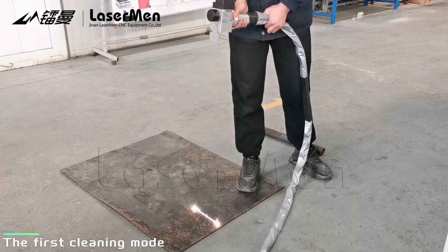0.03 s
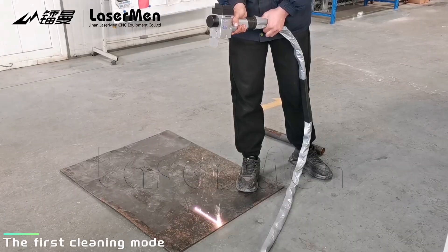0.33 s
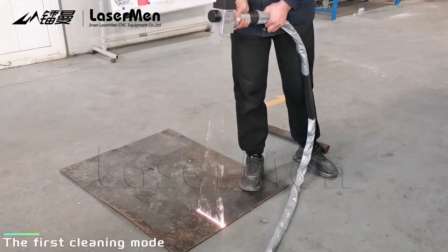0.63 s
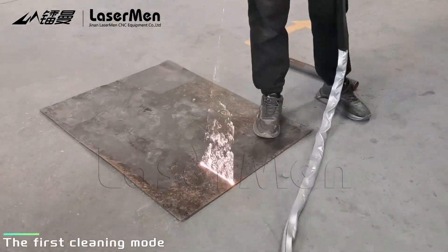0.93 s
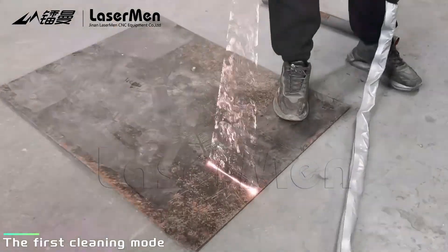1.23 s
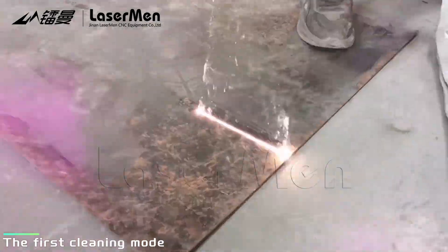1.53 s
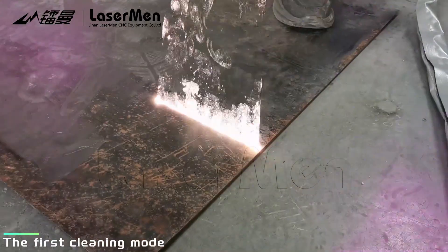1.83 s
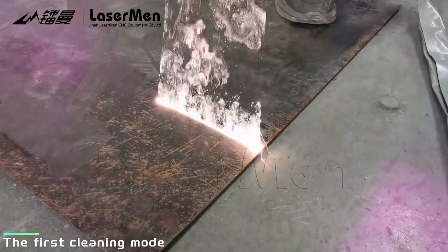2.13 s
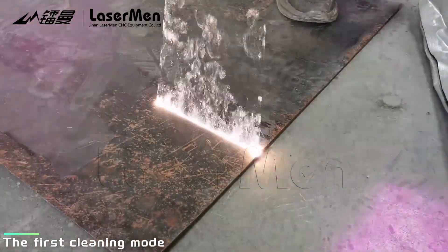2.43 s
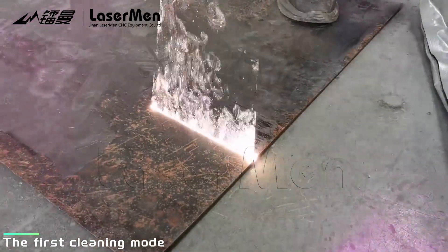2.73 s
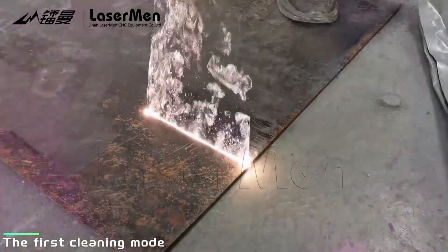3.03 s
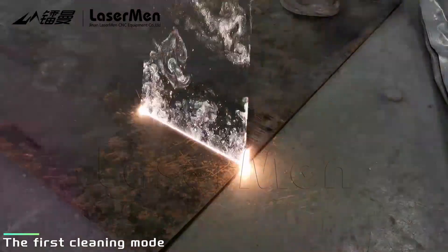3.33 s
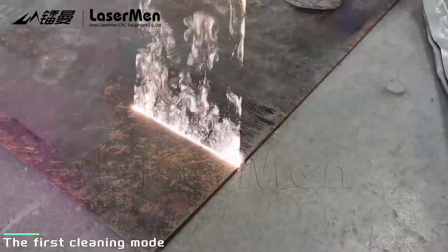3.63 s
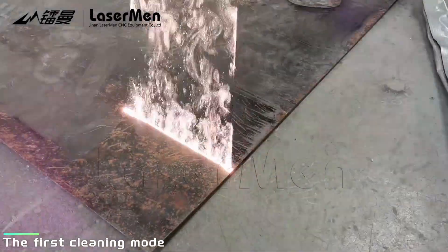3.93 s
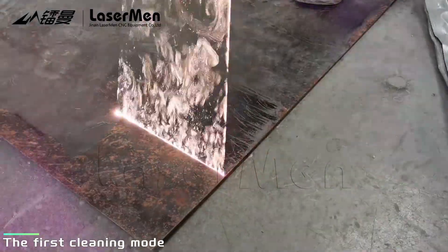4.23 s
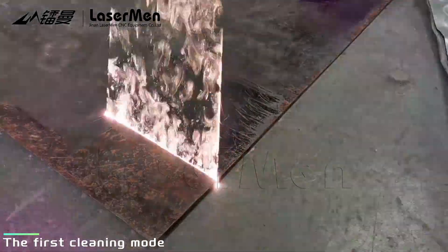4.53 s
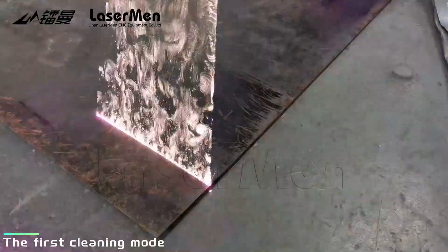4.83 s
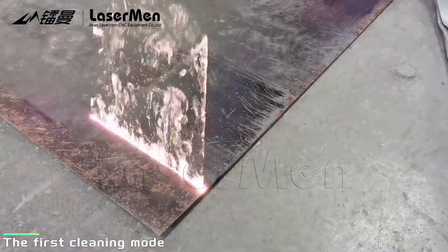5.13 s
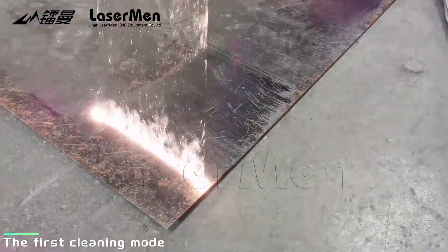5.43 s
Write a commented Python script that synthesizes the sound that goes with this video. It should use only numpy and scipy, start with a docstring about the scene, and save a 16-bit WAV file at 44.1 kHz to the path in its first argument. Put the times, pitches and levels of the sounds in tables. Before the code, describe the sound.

At about 0.1 seconds, after a tiny soft tone, a handheld laser cleaner catches on a rusty steel plate. Fine, rapid crackling fuses into a bright, sizzling buzz of constant pitch, with a lower rasp underneath. It runs without a break, swelling in short, irregular surges several times a second as the beam finds fresh rust, its colour shifting and its position drifting slightly between left and right. Duller, rougher flares at the plate's edge come around 1.7, 3.3, 4.8 and 5.6 seconds. Brief sharp spits stand out near 1.6, 3.0, 3.7 and 4.4 seconds. From about 3.5 seconds a slight high whistle sits within the buzz, which turns briefly hissier near 1.5 and 5.4 seconds. It is still going at the end, around 5.7 seconds. Behind it are a faint hum, low rumble and steady workshop air, heard in stereo with a short hall echo.

```python
"""A handheld laser cleaner strips rust from a steel plate on a workshop floor, heard at a stereo microphone.
Its mirror sweeps the beam along a line 153 times a second; every rust flake pops again at each sweep
until it is gone, so the crackle fuses into a buzz. The buzz swells as the hand finds fresh rust,
shifts in colour with distance and angle, and rasps where the beam flares at the plate's edge.
Behind it lie a hum at the sweep rate, the tail of the hall, a low rumble and steady workshop air."""
import sys
import numpy as np
from scipy import signal
from scipy.fft import rfft, irfft, next_fast_len
from scipy.io import wavfile
from scipy.ndimage import uniform_filter1d

SR = 44100
rng = np.random.default_rng(int(sys.argv[2]) if len(sys.argv) > 2 else 0)


def log_audio(samples):
    """Write samples as a 16-bit WAV file to the path given in sys.argv[1]."""
    # one column per channel
    frames = np.atleast_2d(samples).T
    # limit to full scale, then quantise
    limited = np.clip(frames, -1, 1)
    pcm = np.round(limited * 32767).astype(np.int16)
    wavfile.write(sys.argv[1], SR, pcm)


N = 251370
TIME = np.arange(N) / SR
SIZE = next_fast_len(N + SR)
HZ = np.maximum(np.arange(SIZE // 2 + 1) * SR / SIZE, 1)
SWEEP_HZ = 153.125
SWEEP_SAMPLES = round(SR / SWEEP_HZ)


def flakes(per_s=9000, spread_db=3):
    """Rust flakes burst on the plate at random moments, many small and a few large."""
    sizes = from_db(spread_db * np.minimum(rng.exponential(1, SIZE), 4))
    return sizes * rng.choice([-1, 1], SIZE) * (rng.random(SIZE) < per_s / SR)


# likeness of the pops at the left and right microphone: (frequency [Hz], correlation [0-1])
MIC_LIKENESS = [(450, 0.32), (1000, 0.19), (8000, 0.025)]
# how much of a pop comes back at the next sweep: (frequency [Hz], share [0-1])
POP_SURVIVAL = [(450, 0.74), (1500, 0.6), (4200, 0.56), (7000, 0.63), (10000, 0.55), (15000, 0.5)]
# how gradually a flake heats up before its strongest pop: (frequency [Hz], share [0-1])
HEAT_BUILD_UP = [(600, .75), (1500, .65), (4500, .45), (10000, .15)]
def buzz(stubborn_survival=.94, stubborn_gain=.3):
    """A flake heats up, then pops a little weaker at each sweep; stubborn rust lasts far longer."""
    alike, survival, build_up = over_hz(MIC_LIKENESS), over_hz(POP_SURVIVAL), over_hz(HEAT_BUILD_UP)
    pops = np.sqrt(alike) * rfft(flakes()) + np.sqrt(1 - alike) * rfft([flakes(), flakes()])
    sweep_delay = np.exp(-2j * np.pi * HZ / SWEEP_HZ)
    loose = per_harmonic(1 / ((1 - survival * sweep_delay) * (1 - build_up * survival * sweep_delay)))
    stubborn = per_harmonic(1 / (1 - stubborn_survival * sweep_delay))
    repeats = per_harmonic(loose + stubborn_gain * build_up * stubborn)
    return rms_one(irfft(pops * repeats, SIZE)[:, :N])


# steady burn as distance and rust change: (time [s], relative sizzle level [dB], rasp level [dB])
BURN_LEVELS = [(.1, -36, -52), (.8, -38, -49), (1.0, -38.5, -48.5), (1.45, -39.5, -47.5),
               (1.75, -34.5, -45), (2.05, -36.5, -50), (2.3, -35.5, -47), (2.75, -34.5, -47.5),
               (3.12, -36, -46), (3.3, -34, -47.5), (3.8, -35, -45.5), (4.3, -35.5, -47.5),
               (4.85, -34, -45.5), (5.08, -37.5, -46.5), (5.4, -37, -45.5), (5.7, -37, -46.5)]
# fine dust burns off at once and hisses without pitch: (time [s], share of the sizzle [0-1])
DUST_SHARE = [(1.1, 0), (1.48, 0.38), (1.7, 0.15), (2.6, 0.1), (3.6, 0.01), (5.15, 0), (5.4, 0.66),
              (5.55, 0.15)]
def burning_line(sizzle_rise_db, rasp_rise_db, flare_share):
    """The beam's line as it reaches the microphone through the hall: low rasp and bright sizzle."""
    line = shimmer(workshop(buzz()))
    dust = rms_one(np.array([flakes(), flakes()])[:, :N])
    dust_share = in_time(DUST_SHARE)[0]
    sizzle_db, rasp_db = in_time(BURN_LEVELS)
    patchy = rms_one(blend(line, dust, .23 * dust_share) * rust_patches())
    low = rasp(patchy, flare_share) * from_db(rasp_db + rasp_rise_db)
    bright = sizzle(blend(line, dust, dust_share)) * from_db(sizzle_db + sizzle_rise_db)
    return low + bright


# peak in the bite, gliding as the line moves: (time [s], centre [Hz], height [dB])
BITE_GLIDE = [(.1, 3600, 2.5), (.35, 3300, 4.3), (1, 3060, 3), (2.5, 3360, 4), (3.7, 4000, 1.9),
              (4.8, 4360, 3.7), (5.05, 4950, 3.3), (5.7, 4500, 5)]
# one harmonic whistles as the line nears the plate's edge: (time [s], centre [Hz], height [dB])
EDGE_WHISTLE = [(2.9, 4620, 0), (3.5, 4620, 5), (4.3, 4620, 7), (5.1, 4620, 7), (5.5, 4620, 4)]
# gliding peak in the hiss: (time [s], centre [Hz], height [dB])
HISS_GLIDE = [(.1, 6800, 7), (.8, 6700, -1), (1.05, 7200, 3.5), (1.5, 7100, 0), (2.9, 6260, 5),
              (3.3, 7100, 3.5), (5.7, 7260, 0)]
# band balance with distance and angle to the microphone: (time [s], bite [dB], hiss [dB], air [dB])
SIZZLE_COLOUR = [(.125, -4, -4.5, -4.5), (.56, -3.5, -4.5, -5.5), (1, -11, -5.5, -3), (1.6, -6, -5.5, -5),
                 (2.7, -4, -6.5, -3.5), (3.74, -2.5, -6.5, -3), (4.07, -4, -5.5, -3),
                 (4.4, -4, -10.5, -6.5), (5.35, -2.5, -6, -4.5), (5.5, -4, -7, -3.5)]
# where the line lies in front of the microphone: (time [s], left minus right [dB])
LINE_PAN = [(.1, -2.5), (1.9, 3), (2.5, 2), (3.3, -3), (5.7, 0.5)]
def sizzle(line, trim_db=-1.5, flutter_db=.5):
    """The bright part of the buzz: bite, hiss and air swell and flutter together."""
    bite, hiss, air = (filtered(line, microphones() * band(*edges_hz))
                       for edges_hz in ((2700, 5300), (5300, 8200), (8200, 17000)))
    bite = gliding_peak(bite, BITE_GLIDE, width_hz=400)
    bite = gliding_peak(bite, EDGE_WHISTLE, width_hz=110)
    hiss = gliding_peak(hiss, HISS_GLIDE, width_hz=700)
    mix = sum(evened(part, length_s=.16) * from_db(colour_db)
              for part, colour_db in zip((bite, hiss, air), in_time(SIZZLE_COLOUR)))
    pan_db = in_time(LINE_PAN)[0] * np.array([[.5], [-.5]])
    return mix * ignition(warm_db=-16) * from_db(trim_db + pan_db + flutter_db * drift(34))


# narrow resonance low in the rasp: (time [s], centre [Hz], height [dB])
LOW_GLIDE = [(.3, 780, 6.9), (1.3, 584, 4.7), (2.4, 456, 1.7), (3.8, 790, 1.7), (4.8, 444, 5.7)]
# fullness of the rasp: (time [s], relative level of the lower band [dB])
RASP_BODY = [(.135, -8.5), (.5, -8.5), (.62, -0.5), (.8, -13), (.88, -16), (1.02, -31), (1.12, -5),
             (1.3, -8), (2.35, -4.5), (3.3, -2.5), (3.78, -1), (4.3, -3), (4.8, 1), (5.7, -2.5)]
# broad peak or dip, gliding as the line moves over the plate: (time [s], centre [Hz], height [dB])
RASP_GLIDE = [(.1, 2170, 5), (0.701, 2110, 11.5), (.9, 1300, -4.5), (1.6, 1080, 8), (1.8, 1030, -4.5),
              (5.7, 783, -5.5)]
def rasp(line, flare_share, body_lift_db=1.5):
    """The low buzz of the plume, shaped by two resonances; in a flare the puffs take over."""
    lower, upper = (rms_one(filtered(line, microphones() * band(*edges_hz)))
                    for edges_hz in ((385, 1000), (1000, 2700)))
    lower = gliding_peak(lower, LOW_GLIDE, width_hz=90) * from_db(in_time(RASP_BODY)[0] + body_lift_db)
    plume = evened(gliding_peak(lower + upper, RASP_GLIDE, width_hz=330), length_s=.08)
    return blend(plume, flare_puffs(), flare_share) * ignition(warm_db=1) * from_db(4.5 * flare_share)


def ignition(warm_db, beam_on_s=.056, catch_s=.0957, switch_s=.0017):
    """Gain of the burn: silent, at warm_db once the beam is on, at 0 dB once the rust catches."""
    on, caught = (np.clip((TIME - s) / switch_s, 0, 1) for s in (beam_on_s, catch_s))
    return on * from_db(warm_db * (1 - caught))


# the hand pushes the line onto fresh rust: (time [s], hold [s], sizzle rise [dB], rasp rise [dB])
FRESH_RUST = [(.103, 0.052, 2, 8.5), (.267, .092, 3, 5.5), (0.404, .021, 5, 8.5), (0.592, 0.05, 4, 5.5),
              (0.678, 0.18, 2.5, 4.5), (0.883, 0.072, 4.5, 2.5), (1.012, 0.088, 6, 3.5),
              (1.154, 0.11, 1.5, 2.5), (1.3, .046, 5, 4), (1.415, .024, 5, 5), (1.47, .14, 0.5, 4),
              (1.626, 0.07, 5, 4), (1.775, 0.071, 2, 1), (1.864, 0.019, 3.5, 8.5), (1.965, 0.023, 6, 6),
              (2.061, 0.075, 4.5, 5.5), (2.328, 0.052, 2, 4), (2.466, 0.064, 1.5, 3.5),
              (2.888, .13, 2, 2.5), (3.179, 0.29, 0.5, 5.5), (3.569, 0.021, 2.5, 8), (3.72, 0.1, 1, 1.5),
              (3.983, 0.13, 1.5, 3.5), (4.151, 0.071, 2.5, 6), (4.292, 0.052, 3, 3.5),
              (4.387, 0.029, 6.5, 6), (4.513, 0.068, 2.5, 5), (4.661, .14, 3, 7.5), (4.887, 0.11, 2, 1),
              (5.106, 0.017, 7.5, 7), (5.193, 0.043, 4.5, -2.5), (5.448, 0.17, 3.5, 3),
              (5.633, 0.023, 5, 9.5)]
def surges(attack_s=.018, release_s=.018, lull_s=.015, lull_share=.055):
    """A lull on clean metal, then a swell on fresh rust: the dB added to sizzle and to rasp."""
    rise_db = np.zeros((2, N))
    for s, hold_s, sizzle_db, rasp_db in FRESH_RUST:
        age = TIME - s
        swell = np.clip(age / attack_s, 0, 1) * np.exp(-np.maximum(age - hold_s, 0) / release_s)
        lull = lull_share * np.exp(-np.minimum((age / lull_s + 1) ** 2, 20))
        rise_db += np.outer([sizzle_db, rasp_db], swell - lull)
    return rise_db


# flares at the plate's edge: (time [s], half length [s], share of the rasp [0-1], hum change [dB])
EDGE_FLARES = [(1.449, 0.011, 0.02, 10), (1.67, 0.049, 0.39, 4), (3.276, 0.044, 0.33, 8),
               (4.778, 0.025, 0.83, -3), (5.593, 0.0051, 0.9, 14), (5.658, 0.0059, 0.3, -10)]
def flares():
    """The beam overruns the edge and flares: its share of the rasp, and the dB added to the hum."""
    share, hum_db = sum(np.outer(peaks, bell(TIME - s, half_s)) for s, half_s, *peaks in EDGE_FLARES)
    return np.clip(share, 0, 1), hum_db


def flare_puffs(top_hz=1640, tilt_db_per_octave=-8.5):
    """At the edge one dull puff leaves the plate at every sweep."""
    at = np.arange(0, N, SWEEP_SAMPLES)
    puffs = np.zeros((2, N))
    puffs[:, at] = -1 + .25 * rng.standard_normal((2, len(at)))
    dull = band(340, top_hz) * from_db(tilt_db_per_octave * np.log2(HZ / top_hz))
    return rms_one(filtered(puffs, microphones() * dull))


def rust_patches(depth_db=.5, wander_rad=.99):
    """Rust lies unevenly along the line, so the level rises and falls within each sweep."""
    place = 2 * np.pi * SWEEP_HZ * TIME
    return from_db(depth_db * sum(np.cos(k * place + wander_rad * drift(4.4)) for k in range(1, 4)))


def shimmer(x, depth_db=2.7, width_hz=110, length_s=.035):
    """Flakes at shifting distances interfere, so patches of the spectrum swell and fade."""
    hz, s, frames = signal.stft(x, SR, nperseg=1024)
    over_bins = bell(hz[:, None] - hz, width_hz)
    over_frames = np.exp(-np.minimum(((s[:, None] - s) / length_s) ** 2, 50))
    patches = over_bins @ rng.standard_normal(frames.shape) @ over_frames
    gain = from_db(depth_db * patches / patches.std())
    return rms_one(signal.istft(frames * gain, SR)[1][:, :N])


# thick flakes on the plate: (time [s], half length [s], centre [Hz], width [octaves], level [dB])
THICK_FLAKES = [(0.626, 0.018, 746, 0.56, -45), (0.685, 0.017, 2100, .3, -44),
                (0.828, .012, 1250, .5, -42.5), (1.626, 0.016, 1100, 0.83, -36.5),
                (1.665, 0.015, 5600, 0.54, -35.5), (2.952, 0.011, 4400, .9, -34),
                (3.337, .025, 750, 0.56, -45), (3.745, .025, 4400, 0.64, -33),
                (4.419, 0.0083, 4360, 1, -31.5), (4.777, 0.015, 4200, 0.78, -35.5),
                (4.948, 0.02, 4500, 0.41, -35.5), (5.596, 0.014, 4200, 0.85, -33)]
def spits(decay_s=.00057, tail_db=-16.5, spread_db=.5):
    """A thick flake spits the same sharp pop at every sweep, briefly swelling and fading."""
    bins = np.arange(SWEEP_SAMPLES // 2 + 1) * SIZE // SWEEP_SAMPLES
    mic_colour, out = microphones()[:, bins], np.zeros((2, N))
    decay = np.exp(-TIME[:SWEEP_SAMPLES] / decay_s) + from_db(tail_db)
    for s, half_s, centre_hz, octaves, level_db in THICK_FLAKES:
        burst = rng.standard_normal((2, SWEEP_SAMPLES)) * decay
        colour = mic_colour * bell(np.log2(HZ[bins] / centre_hz), octaves)
        pop = rms_one(irfft(rfft(burst) * colour, SWEEP_SAMPLES))
        strength = from_db(level_db + spread_db * rng.standard_normal(N // SWEEP_SAMPLES + 2))
        at = np.flatnonzero(np.abs(TIME - s) < np.pi * half_s)
        sweep, place = np.divmod(at + rng.integers(SWEEP_SAMPLES), SWEEP_SAMPLES)
        out[:, at] += pop[:, place] * strength[sweep] * bell(TIME[at] - s, half_s)
    return out


def start_ring(start_s=.052, length_s=.04, hz=598, level_db=-43):
    """A brief tone, dead centre, just before the rust catches."""
    progress = np.clip((TIME - start_s) / length_s, 0, 1)
    swell = np.sqrt(np.abs(np.sin(np.pi * progress)))
    return from_db(level_db) * swell * np.sin(2 * np.pi * hz * TIME)


# hum at the sweep rate, between surges: (time [s], level [dB])
HUM_LEVEL = [(.2, -62.5), (1.68, -56), (1.82, -72), (2.1, -59), (3.45, -56), (5.7, -58)]
# the octave above it: (time [s], level [dB])
OCTAVE_LEVEL = [(.3, -73), (.42, -59), (1.2, -51), (2.3, -66.5), (4.1, -57.5), (4.7, -65.5), (5.05, -56.5),
                (5.4, -61), (5.5, -49)]
def hum(swell_db):
    """The sweep's two lowest harmonics, a little to the right, wavering as the hand moves."""
    def harmonic(order, level_db, pan_db, waver_rad, mic_waver_rad):
        waver = waver_rad * drift(5) + mic_waver_rad * np.array([drift(6), drift(6)])
        tone = np.sqrt(2) * np.sin(2 * np.pi * order * SWEEP_HZ * TIME + waver)
        return tone * from_db(level_db + drift(9)) * from_db([[-pan_db], [pan_db]])

    first_db = in_time(HUM_LEVEL)[0] + swell_db
    octave_db = in_time(OCTAVE_LEVEL)[0] + .76 * swell_db
    return (harmonic(1, first_db, pan_db=1.1, waver_rad=2, mic_waver_rad=.85)
            + harmonic(2, octave_db, pan_db=.5, waver_rad=.82, mic_waver_rad=1))


# colour of the buzz at the left microphone: (frequency [Hz], level [dB])
LEFT_MIC = [(450, -22.5), (800, -10), (1100, -17.5), (1450, -9), (2300, -16), (3100, -3), (4300, 6),
            (5200, -4.5), (6400, -7), (8200, -14), (9150, -7), (9950, -12.5), (10800, -10), (15500, -21)]
# and at the right microphone: (frequency [Hz], level [dB])
RIGHT_MIC = [(450, -16.5), (800, -11.5), (1450, -7.5), (2700, -10.5), (3150, 3.5), (4200, 11), (4620, 4),
             (4950, -6), (6000, -5), (6950, 1.5), (7900, -11.5), (10100, -24.5), (11000, -15),
             (15500, -22.5)]
def microphones():
    """Each side of the stereo microphone hears the plate with its own peaks and dips."""
    return from_db([over_hz(LEFT_MIC), over_hz(RIGHT_MIC)])


def workshop(x, t60_s=.77, tail_db=-4, positions=6):
    """The hall adds a diffuse tail, different on each side; it changes as tool and microphone move."""
    out, spectrum = x, rfft(x, SIZE)
    position = TIME / TIME[-1] * (positions - 1)
    for k in range(positions):
        tail = rng.standard_normal((2, SR)) * from_db(-60 * TIME[:SR] / t60_s)
        tail /= np.sqrt(np.sum(tail ** 2, axis=1, keepdims=True))
        crossfade = np.sqrt(np.maximum(1 - np.abs(position - k), 0))
        out = out + from_db(tail_db) * crossfade * irfft(spectrum * rfft(tail, SIZE), SIZE)[:, :N]
    return out


# colour of the low rumble: (frequency [Hz], relative level [dB])
RUMBLE_SPECTRUM = [(20, -11), (55, -15), (200, -2.5), (400, -13.5), (900, -39)]
# its coming and going: (time [s], relative level [dB])
RUMBLE_LEVEL = [(.07, -67.5), (.13, -78.5), (1.68, -70.5), (2, -80), (3.1, -78), (3.22, -73.5), (5.7, -67)]
def rumble(rasp_rise_db, flare_share, lift_db=7.5):
    """A low rumble to the right of the microphone rises as surges and flares stir the air."""
    level_db = in_time(RUMBLE_LEVEL)[0] + lift_db + rasp_rise_db + 4 * flare_share
    return room_noise(RUMBLE_SPECTRUM, side_db=-27, pan_db=7) * from_db(level_db)


# room tone of the workshop: (frequency [Hz], relative level [dB])
AIR_SPECTRUM = [(70, -32), (125, 3), (190, -3.5), (260, -0.5), (420, -7.5), (1000, -14), (12000, -27)]
def workshop_air():
    """Faint, steady air all around the microphone."""
    return room_noise(AIR_SPECTRUM, side_db=-.5, pan_db=-1.5) * from_db(-63)


def room_noise(spectrum, side_db, pan_db):
    """Coloured noise, partly shared by left and right; its middle has rms 1."""
    mid, side = filtered(rng.standard_normal((2, SIZE)), from_db(over_hz(spectrum)))
    pair = mid + from_db(side_db) * side * np.array([[1], [-1]])
    return rms_one(pair * from_db([[-pan_db], [pan_db]]))


def gliding_peak(x, track, width_hz):
    """Lift or dip a bell-shaped band whose centre and height follow a track; the power is kept."""
    hz, s, frames = signal.stft(x, SR, nperseg=512)
    at, centre_hz, height_db = np.transpose(track)
    offset_hz = hz[:, None] - np.interp(s, at, centre_hz)
    gain = from_db(np.interp(s, at, height_db) * bell(offset_hz, width_hz))
    power = np.mean(np.abs(frames) ** 2, axis=(0, 2))
    gain /= np.sqrt(power @ gain ** 2 / power.sum())
    return signal.istft(frames * gain, SR)[1][:, :N]


def evened(x, length_s):
    """The beam's power is constant: hold the level of a stereo pair steady; its middle has rms 1."""
    smoothing = np.exp(-np.minimum((HZ * length_s) ** 2, 50))
    power = filtered(np.mean(x ** 2, axis=0), smoothing)
    return rms_one(x / np.sqrt(np.maximum(power, power.mean() / 10)))


def per_harmonic(comb):
    """Give every harmonic of a comb the same power."""
    return comb / np.sqrt(uniform_filter1d(np.abs(comb) ** 2, round(SWEEP_HZ * SIZE / SR)))


def drift(rate_hz):
    """A random wander of spread 1, mostly slower than rate_hz."""
    step, size = 32, 8192
    hz = np.arange(size // 2 + 1) * SR / step / size
    slow = irfft(rfft(rng.standard_normal(size)) / (1 + (hz / rate_hz) ** 4))
    return np.interp(np.arange(N) / step, np.arange(size), slow / slow.std())


def blend(x, other, share):
    """Trade a share of the power of x for another sound."""
    return np.sqrt(1 - share) * x + np.sqrt(share) * other


def bell(offset, width):
    """A bell curve of height 1."""
    return np.exp(-(offset / width) ** 2)


def band(low_hz, high_hz):
    """Response of a steep band-pass; neighbours add up to even power."""
    return ((1 + (low_hz / HZ) ** 24) * (1 + (HZ / high_hz) ** 24)) ** -.5


def filtered(x, response):
    """Pass x through a frequency response."""
    return irfft(rfft(x, SIZE) * response, SIZE)[..., :N]


def in_time(rows):
    """The columns of a curve at every sample."""
    s, *columns = np.transpose(rows)
    return [np.interp(TIME, s, column) for column in columns]


def over_hz(points):
    """A table joined by straight lines on a log-frequency axis."""
    hz, value = np.transpose(points)
    return np.interp(np.log(HZ), np.log(hz), value)


def rms_one(x):
    """Scale a stereo pair so that its middle has rms 1."""
    return x / np.sqrt(np.mean(x.mean(axis=0) ** 2) + 1e-20)


def from_db(db):
    """Decibels to gain."""
    return 10 ** (np.asarray(db) / 20)


def scene():
    """The burning line in front of the microphone, with hum, rumble and workshop air behind it."""
    sizzle_rise_db, rasp_rise_db = surges()
    flare_share, flare_hum_db = flares()
    burn = burning_line(sizzle_rise_db, rasp_rise_db, flare_share)
    background = hum(rasp_rise_db + flare_hum_db) + rumble(rasp_rise_db, flare_share) + workshop_air()
    return burn + spits() + start_ring() + background


def record(dry, cutoff_hz=15750):
    """The highest treble is cut steeply."""
    return filtered(dry, 1 / np.sqrt(1 + (HZ / cutoff_hz) ** 400))


dry = scene()
out = record(dry)
log_audio(out)
```